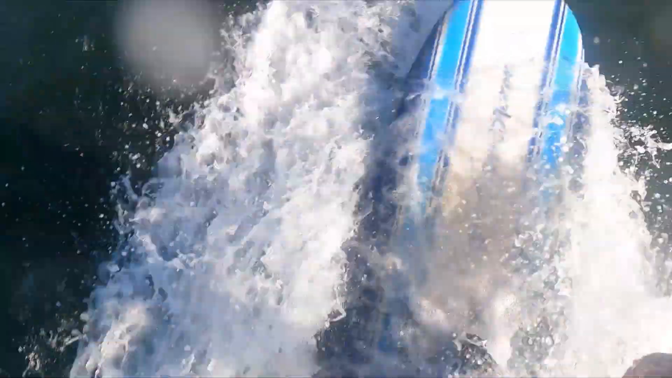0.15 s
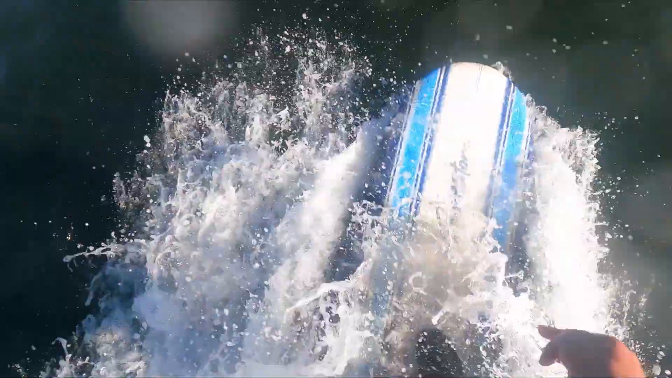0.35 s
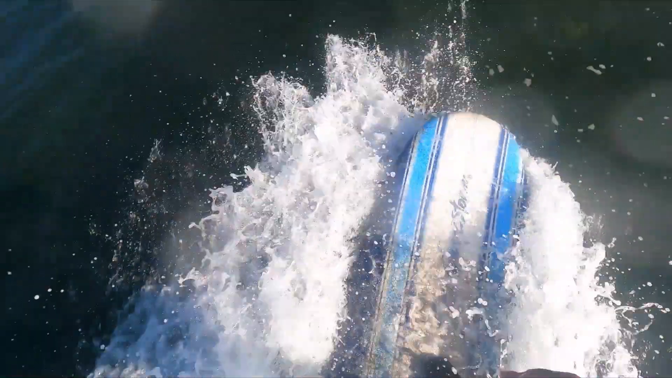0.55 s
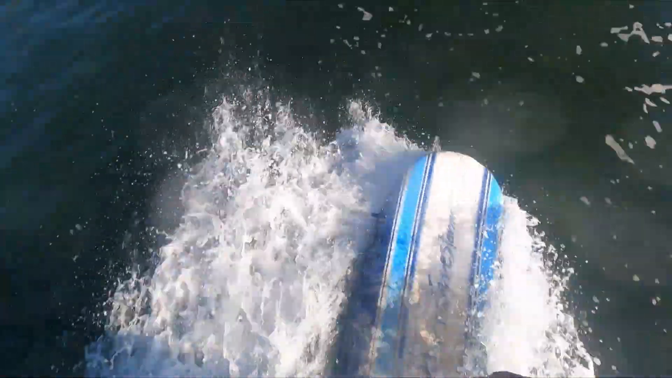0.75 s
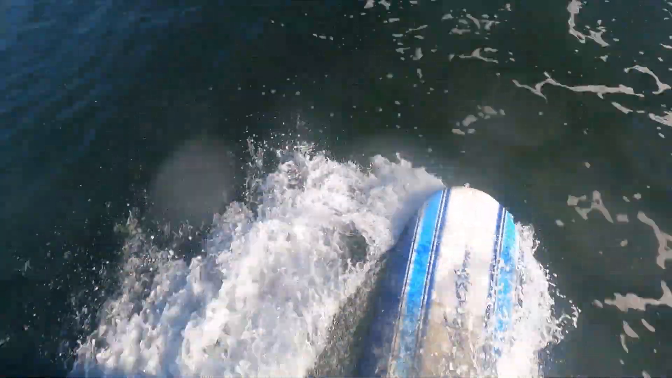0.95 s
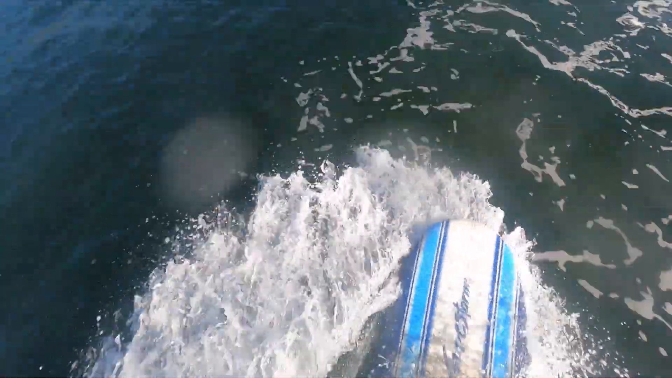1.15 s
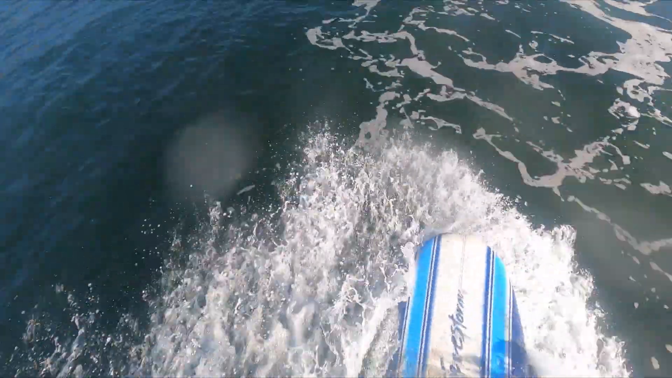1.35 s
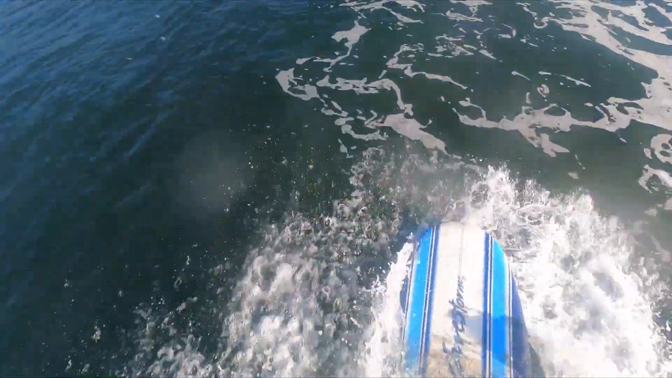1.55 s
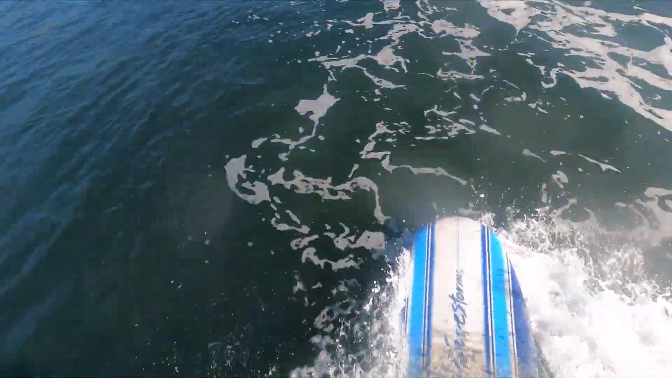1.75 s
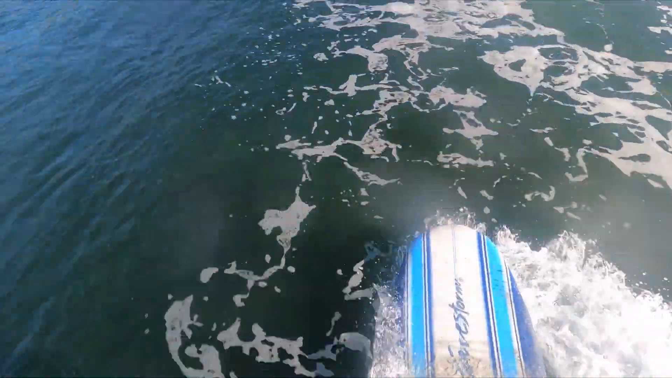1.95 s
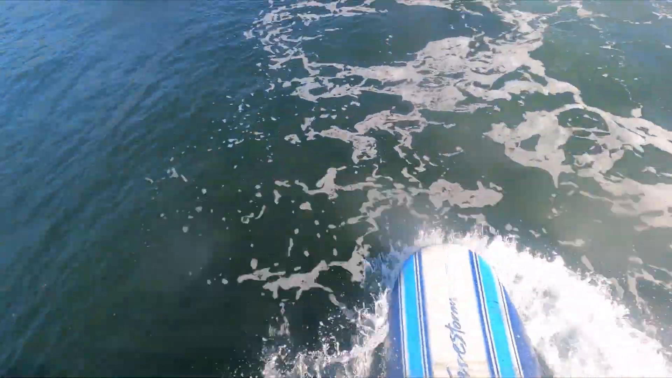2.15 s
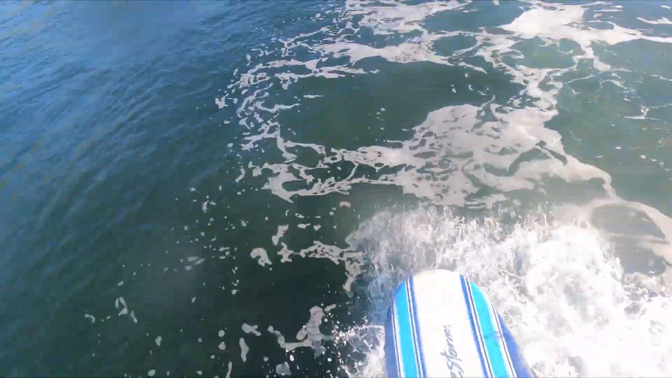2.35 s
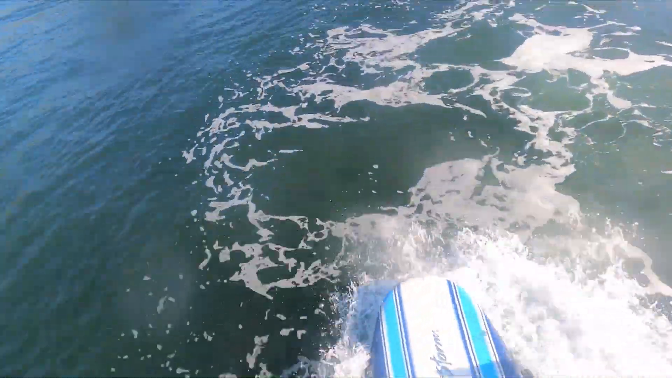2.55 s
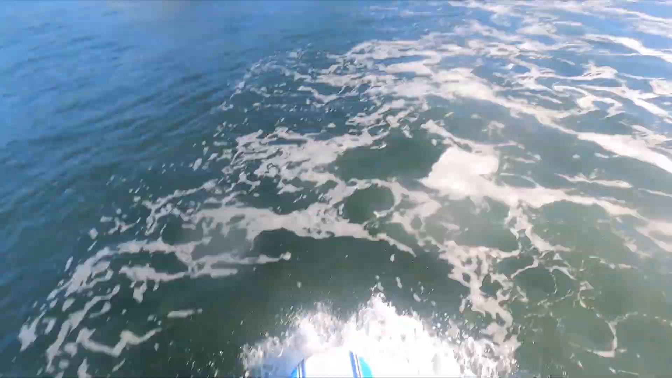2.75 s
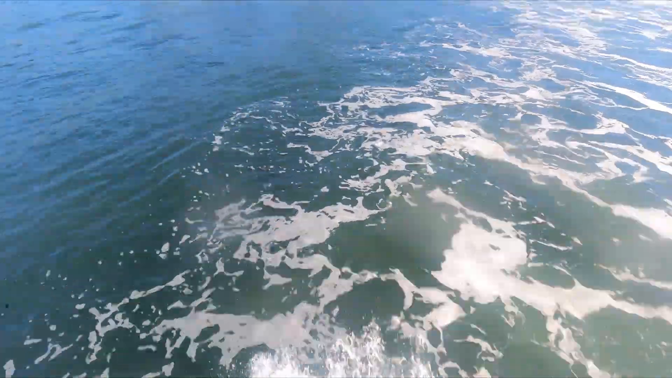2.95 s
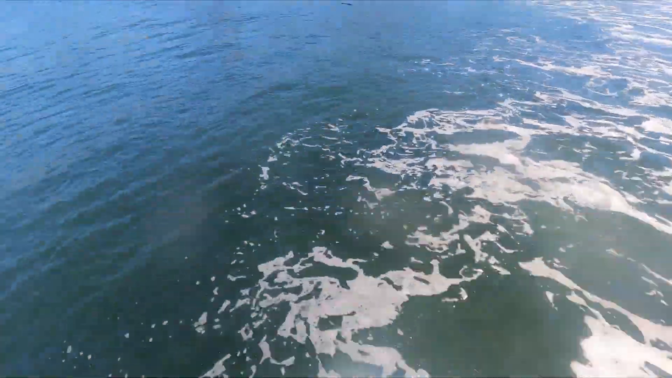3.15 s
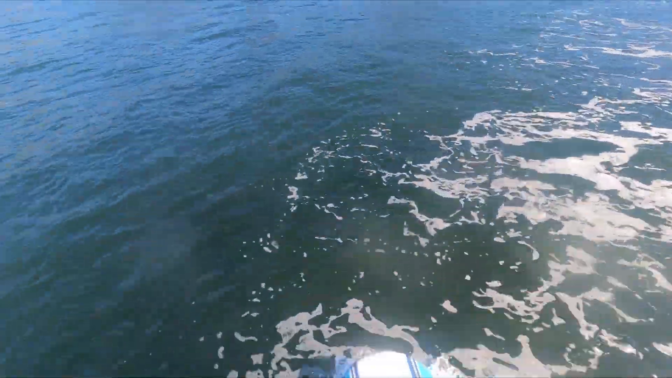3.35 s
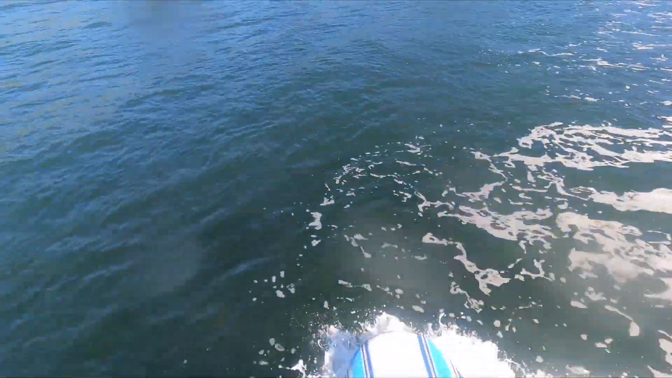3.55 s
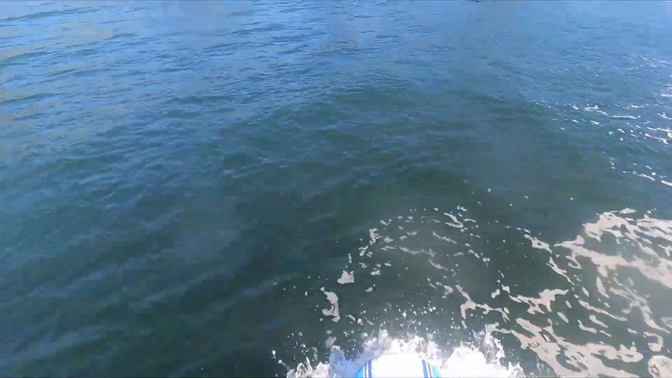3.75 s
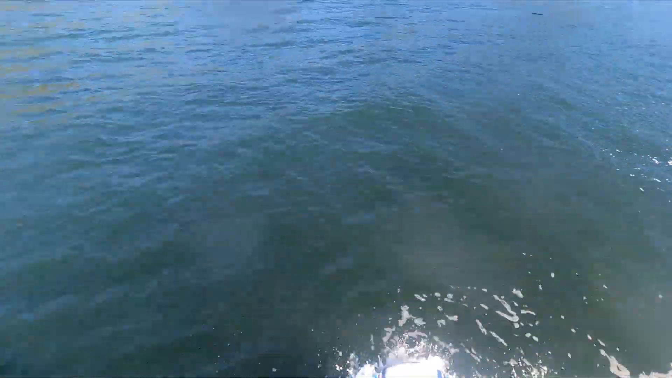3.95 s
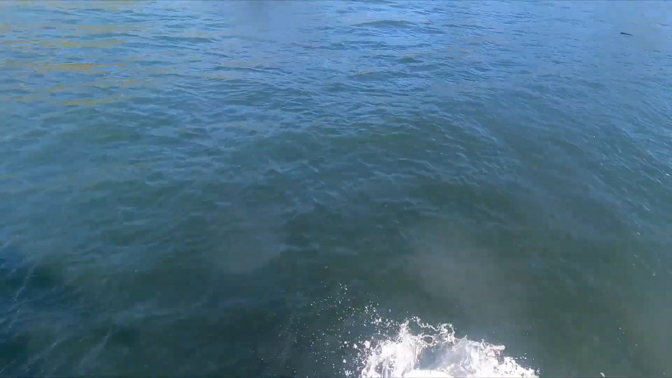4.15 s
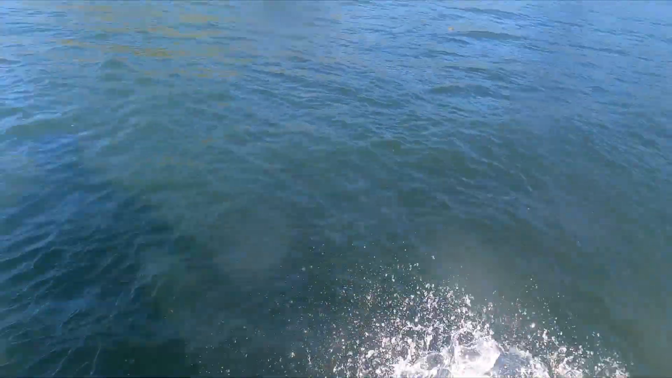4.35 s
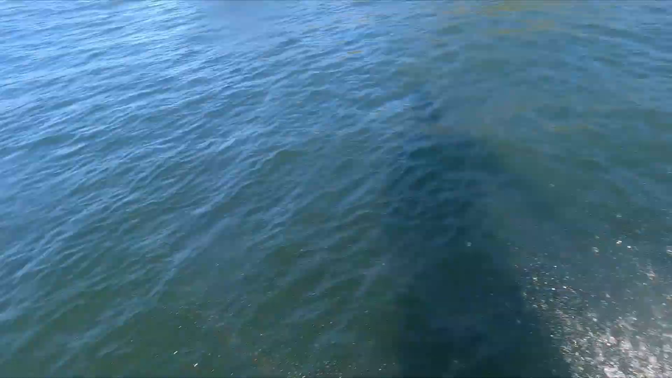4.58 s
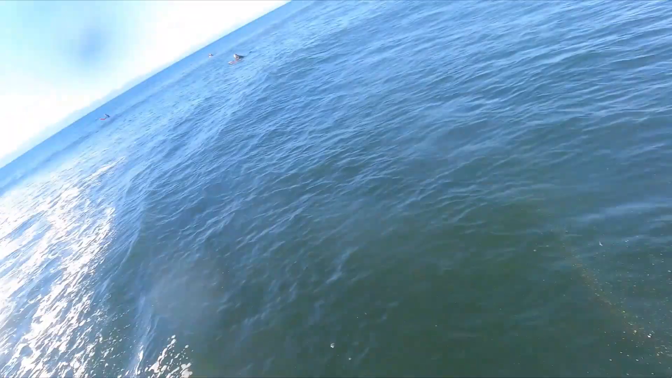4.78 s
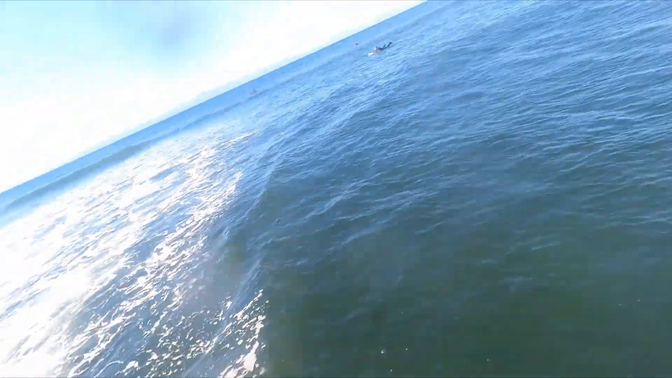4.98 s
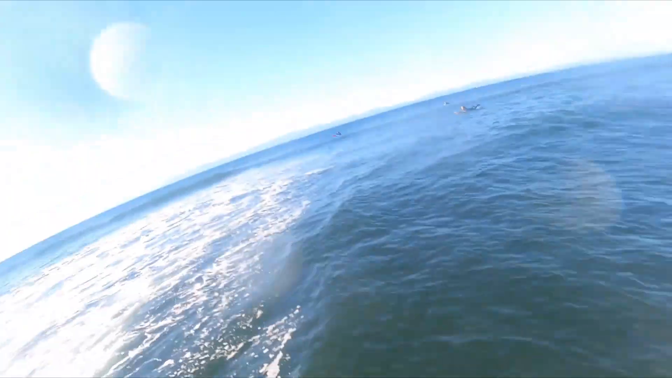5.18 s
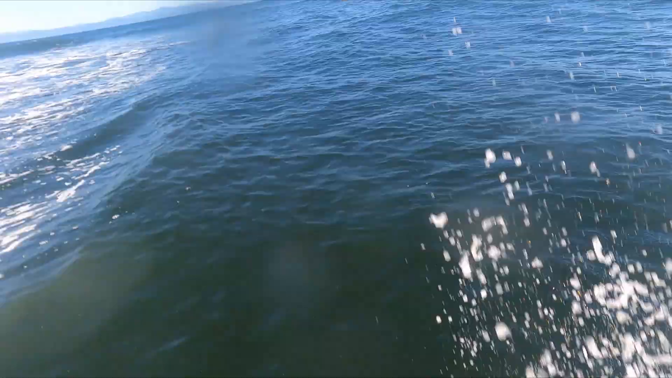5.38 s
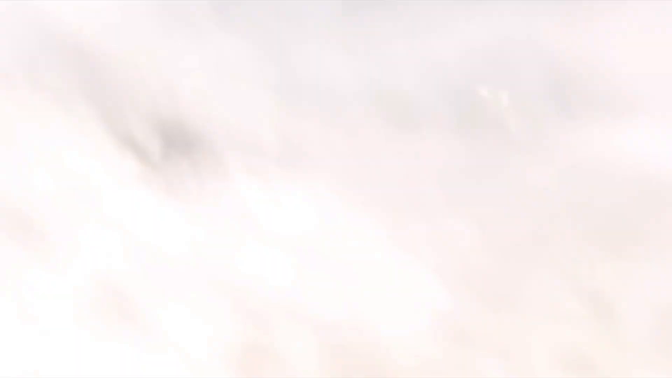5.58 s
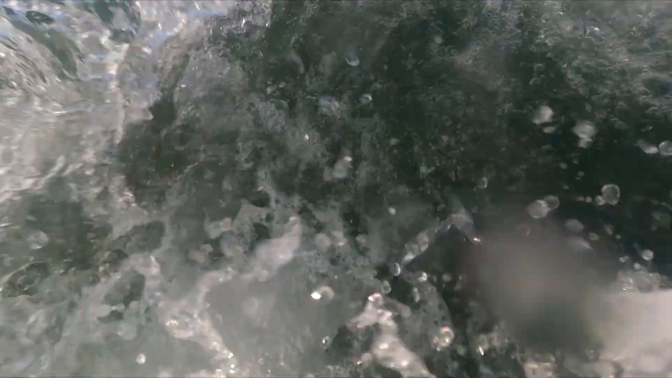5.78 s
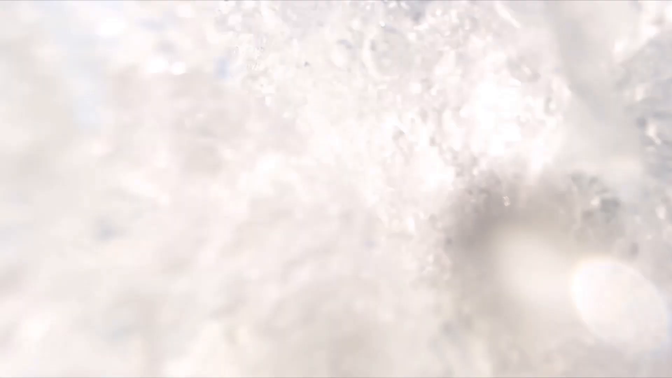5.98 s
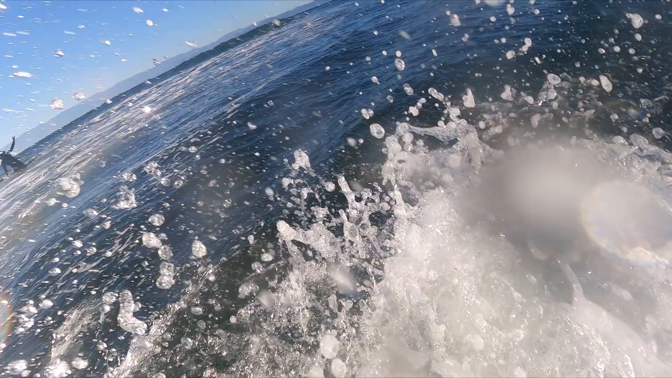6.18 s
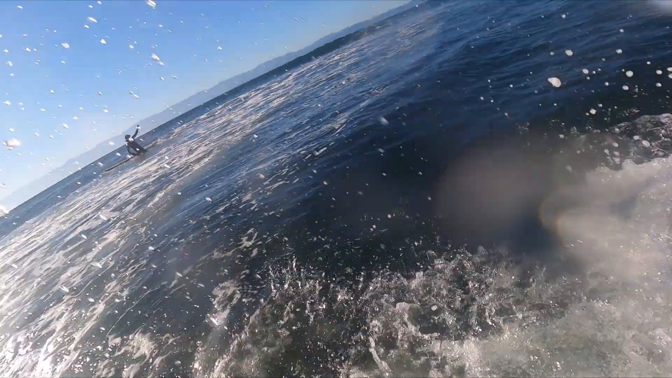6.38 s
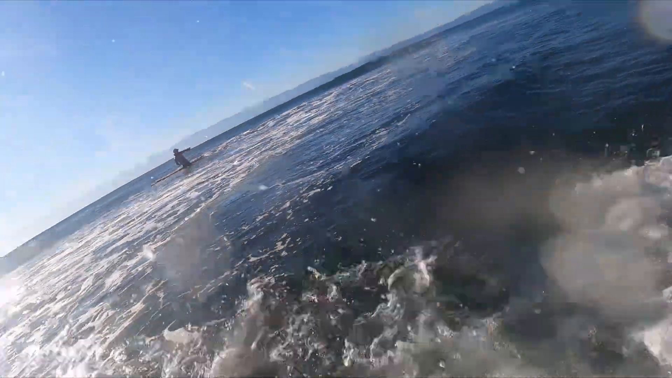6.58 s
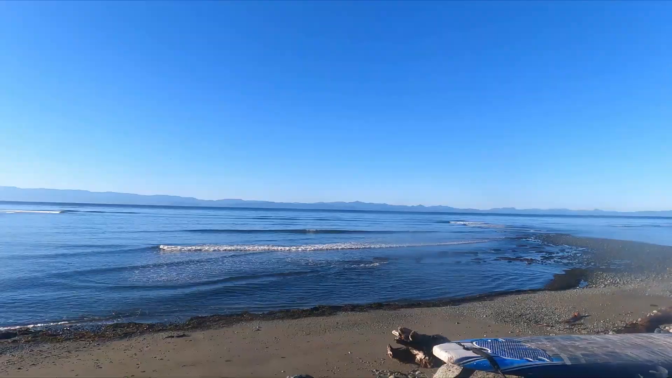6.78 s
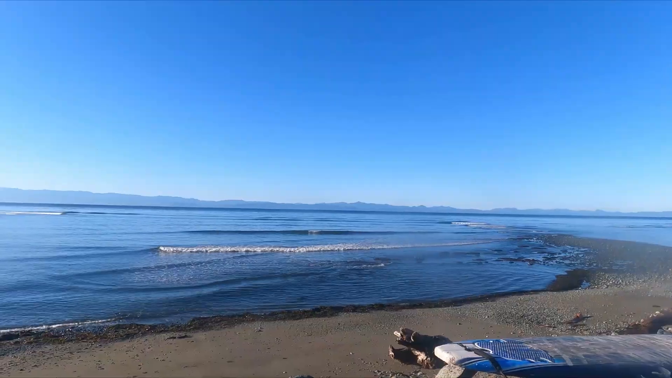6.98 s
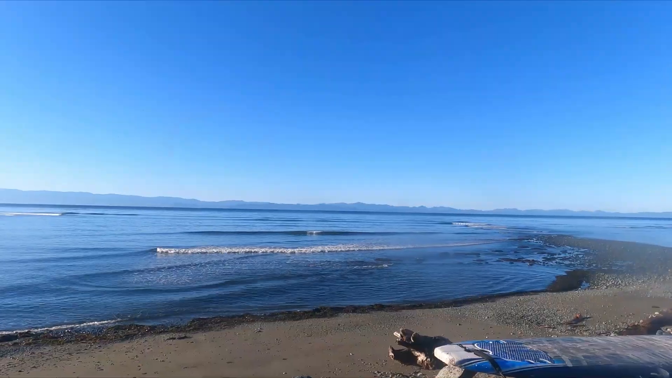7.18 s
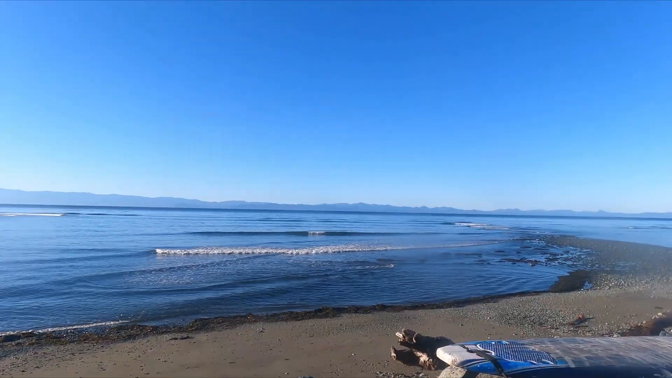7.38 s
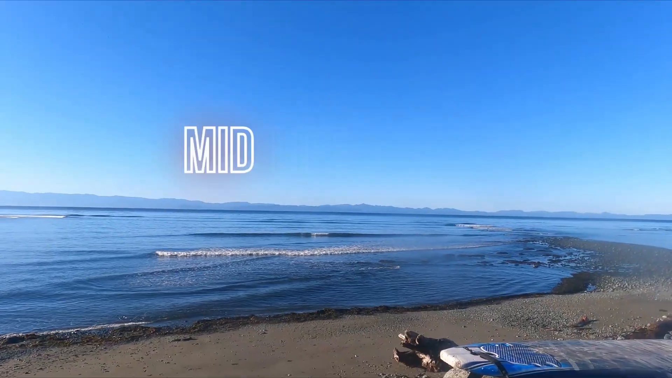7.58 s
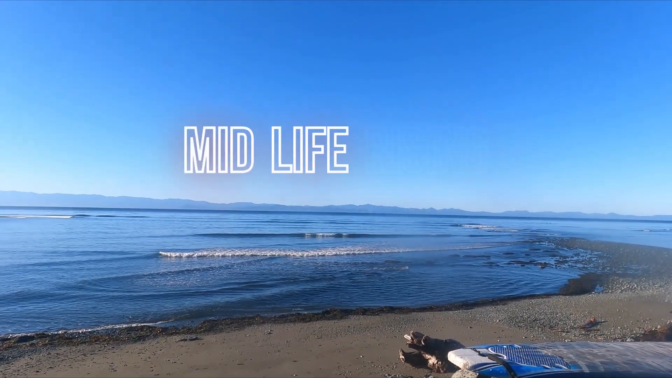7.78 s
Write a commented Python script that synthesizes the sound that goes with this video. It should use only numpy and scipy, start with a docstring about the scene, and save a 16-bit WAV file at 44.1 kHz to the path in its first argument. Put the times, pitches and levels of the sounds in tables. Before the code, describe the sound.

From 0 to about 5.2 seconds, a surfboard planes over the sea, heard from a small microphone in a housing close to the water. Bubbly spray hisses over churning water, strongest at first and fluctuating. Low wind rumble buffets in gusts and gradually eases, with a wavering hollow hum, breathy midrange whistling and occasional faint high hiss. Dull thumps come near 0.3, 3.05 and 4.9 seconds, with a small drop at 4.8. At 5.3 the board plunges: sharp wet slaps and heavy low thumps, then another hard cluster around 5.65. Muffled white water swells to a crest near 6.0, with spluttering sheets, gurgles, ringing bubbles and more slaps until 6.5, draining quickly. A short silence at 6.75 to 6.95 gives way to a calm, very quiet shore: light low breeze, distant surf, and dry ticks near 7.05, 7.5 and, loudest, 7.8, where a soft low thump also lands.

```python
"""Sea, then shore: a surfboard planes; bow spray is bubbly noise, wind is low turbulence plus a hum and whistles.
At 5.3 s the board plunges: slaps ring trapped air, sheets of water splutter as bubble swarms,
large bubbles ring with rising pitch and low surges thump on the diaphragm.
After a short silence a calm shore follows: light wind, far surf and a few dry ticks."""
import sys
import numpy as np
from scipy import signal
from scipy.fft import rfft, irfft, next_fast_len
from scipy.io import wavfile
from scipy.ndimage import uniform_filter1d, map_coordinates

SR = 44100
rng = np.random.default_rng(int(sys.argv[2]) if len(sys.argv) > 2 else 0)


def digitize_waveform(pressure):
    """Quantize a signal to 16-bit integers and store it at the path in sys.argv[1].

    Rows of a 2-D input are taken as channels; values are limited to [-1, 1].
    """
    field = np.atleast_2d(pressure).T
    bounded = np.clip(field, -1, 1)
    quanta = np.round(bounded * 32767).astype(np.int16)
    wavfile.write(sys.argv[1], SR, quanta)


N = 345289

# Column side_db is left minus right; level_db is relative within a table.
RIDE_END_S, SHORE_START_S = 6.73, 6.965
PLUNGE_S, STALL_S = 5.27, 0.16  # plunge; fade of the ride's noise

# wind on the ports; the headwind eases as the board slows
HEADWIND_START_DB, EASE_DB_PER_S = -24, 1.64
BREEZE_DB = -35  # on the shore
# gusts: middle_s, length_s, level_db
GUSTS = [(.31, 0.35, -19.5), (.76, 0.26, -23), (1.15, 0.23, -21), (2.86, 0.2, -23), (3.22, 0.29, -27.5),
         (4.88, 0.19, -18.5), (5.31, 0.091, -14), (7.09, 0.18, -29.5), (7.55, 0.11, -27),
         (7.79, 0.19, -25.5)]
# spectrum of wind rumble: freq_hz, density_db_per_hz
RUMBLE_SPECTRUM = [(8, -20), (20, 2), (42, -4.5), (85, -6.5), (130, -14.5), (200, -19), (400, -34),
                   (1000, -71.5)]
# hoots of air across a hollow of the housing: middle_s, length_s, level_db
HOOTS = [(.16, 0.34, -25), (.86, 0.18, -29), (1.15, 0.57, -31.5), (1.6, 0.44, -31.5), (2.32, 0.21, -27),
         (2.56, 0.09, -24.5), (2.83, 0.22, -26), (3.75, 0.12, -28), (4.05, 0.32, -28), (4.44, 0.11, -32.5),
         (4.7, 0.076, -27.5)]
HUM_HZ, HUM_FLOOR_DB = 212.9, -39  # hollow's mean pitch; level between hoots
# crosswinds that make the housing whistle: middle_s, length_s, level_db
CROSSWINDS = [(.25, 0.34, -35.5), (1.67, 0.82, -32), (2.55, 0.81, -35.5), (3.37, 0.74, -31.5),
              (4.98, 0.12, -41.5)]
WHISTLE_FLOOR_DB = -37.5  # between crosswinds
# housing resonances in the airflow: centre_hz, nominal_width_hz, level_db, side_db
WHISTLE_MODES = [(786, 170, -6, 3.5), (950.6, 115, -0.5, 5.5), (1180, 540, -17, 17)]
# drifting hiss at a port edge: time_s, centre_hz, level_db
EDGE_HISS = [(1.2, 5000, -69), (1.48, 4824, -45), (1.83, 4720, -47.5), (2.1, 4660, -58), (2.95, 5050, -65),
             (3.13, 4980, -47.5), (3.37, 4720, -44), (3.62, 4660, -49.5), (3.75, 4645, -55.5),
             (4.7, 4690, -50.5), (5.0, 4860, -47), (5.15, 5050, -62)]

# bow wave, levels before trim: time_s, churn_db, spray_db
BOW_WAVE = [(0.0, -32.5, -30.5), (0.25, -34, -33.5), (0.34, -36, -35.5), (0.92, -33.5, -37.5),
            (1.66, -33.5, -35), (2.07, -34.5, -39), (2.57, -29.5, -36), (3.03, -35.5, -38.5),
            (3.19, -30, -38), (3.28, -35.5, -39), (3.86, -33, -39), (4.79, -36.5, -36),
            (4.84, -36.5, -39.5), (5.03, -28, -40), (5.1, -34.5, -42)]
# spectrum of churning water: freq_hz, density_db_per_hz
CHURN_SPECTRUM = [(60, -22.5), (140, -2.5), (250, 1.5), (300, -3), (380, 0), (460, -4), (550, -11),
                  (750, -8.5), (1000, -14.5), (1400, -19), (3000, -49)]
# spectrum of spray: freq_hz, density_db_per_hz
SPRAY_SPECTRUM = [(500, -3.5), (1350, -9.5), (1700, -1), (1900, -2.5), (2200, 4), (2600, -3.5), (2950, -2),
                  (3350, -10.5), (3900, -11), (4230, -5), (4450, -8.5), (4750, -6), (5600, -11.5),
                  (7000, -13), (9000, -17), (12000, -26)]

# white water builds after the plunge, crests, drains; each layer scales these slopes
CREST_S, FLOW_BUILD_DB_PER_S, FLOW_DRAIN_DB_PER_S = 6.043, 17, 17.5
# rocking of the ports: level at the crest, slopes before and after
ROCK_CREST_DB, ROCK_BUILD_DB_PER_S, ROCK_DRAIN_DB_PER_S = -24.5, 23, 26.5
# housing colour of water running over it: freq_hz, gain_db
HOUSING_COLOUR = [(750, 1), (1250, -3), (1600, 1), (2200, 1), (2650, -4), (3000, 2.5), (3550, -5),
                  (4200, 2)]
# drops and slaps on the housing: start_s, level_db, trapped_air_hz, decay_s, side_db
SLAPS = [(4.797, -21, 4300, 0.007, -3.5), (5.273, -9, 1100, 0.002, 6), (5.315, -11, 530, 0.013, 6.5),
         (5.324, -15, 4300, 0.0024, -2.5), (5.331, -6, 440, 0.0084, -4), (5.3325, -11, 2900, .001, 2),
         (5.352, -22, 5000, .0027, -0.5), (5.372, -25.5, 5000, 0.00233, 2.5),
         (5.385, -7.5, 423, 0.0047, 2.5), (5.385, -14.5, 2200, 0.0008, -6), (5.594, -22, 1800, 0.0067, 0),
         (5.6317, -6.5, 1800, 0.003, -1), (5.649, -0.5, 2170, 0.0014, -1.5),
         (5.659, -16, 5800, 0.0011, 2.5), (5.671, -19, 1770, 0.002, -9), (5.680, -14.5, 5000, 0.0021, -4.5),
         (6.010, -11.5, 400, .004, 0), (6.011, -15, 5200, 0.0036, 0), (6.180, -9.5, 1500, 0.0023, 6),
         (6.191, -8, 690, 0.0075, 4), (6.259, -5, 850, 0.0018, 3), (6.274, -12.5, 2200, 0.002, -4.5),
         (6.356, -13.5, 1090, 0.0016, 4), (6.393, -20, 600, 0.0036, 4), (6.428, -21, 1000, 0.0028, 5),
         (6.448, -15, 885, 0.0015, 2), (6.478, -9, 800, 0.0021, 2.5)]
# sheets of water over the housing: start_s, length_s, level_db, centre_hz, gurgle_re_sheet_db, side_db
SHEETS = [(5.7025, 0.014, -12, 2030, -13, -2.5), (5.741, 0.014, -18, 4300, -16.5, -1),
          (5.748, .025, -16, 1470, -8, -2), (6.001, 0.052, -20.5, 4870, -9, 0.5),
          (6.02, 0.048, -19.5, 1560, -2, 0.5), (6.07, 0.034, -24.5, 1510, 1, 1),
          (6.111, .031, -24.5, 2960, 2, 0), (6.167, .042, -20, 1560, 2, 0.5), (6.21, .066, -23, 1255, 0, 2),
          (6.3, .027, -28, 1380, 1, 1.5)]
# large bubbles and drips close by: start_s, level_db, initial_pitch_hz, swell_s, side_db
BUBBLES = [(5.2725, -15, 1820, 0.0013, -10), (5.274, -25, 2430, .004, -9), (5.337, -29, 2380, 0.0044, -7.5),
           (5.875, -23.5, 6890, 0.0011, 0), (6.026, -18.5, 1920, 0.0018, -0.5),
           (6.091, -20.5, 3770, 0.0016, 8.5), (6.118, -14, 1737, 0.0025, -2.5),
           (6.119, -20.5, 4230, 0.0017, -0.5), (6.136, -15, 1513, 0.0025, 13),
           (6.18, -23.5, 4160, .0015, -1), (6.195, -22.5, 3750, 0.0015, -2), (6.202, -20, 1603, .003, 4),
           (6.479, -23.5, 288, 0.0023, 1), (6.513, -39, 4700, 0.0014, 0), (6.52, -32.5, 1400, .002, 0),
           (6.600, -37, 5100, .0018, 0)]
# pressure surges of air and water on the diaphragm: centre_s, level_db, pitch_hz
THUMPS = [(.305, -15, 45), (3.049, -13.5, 45), (4.9, -12, 50.4), (5.333, -2, 44.6), (5.385, -4.5, 41.3),
          (5.653, -16, 75), (5.72, -9.5, 70), (6.014, -12.5, 120), (6.048, -8.5, 85), (6.171, -8, 92.5),
          (6.198, -7, 67), (7.744, -14.5, 41.4)]
# water films muffling the ports: middle_s, length_s, depth_db
FILMS = [(5.417, 0.053, 4), (5.493, 0.021, 8), (5.818, 0.029, 10.5), (6.144, 0.0143, 13), (6.288, .03, 4.5)]
FILM_CORNER_HZ = 900  # film damps the sound above this

# dry ticks close to the microphone: start_s, level_db
TICKS = [(7.036, -29), (7.502, -27), (7.801, -18)]
# resonances of a tick: centre_hz, stage_width_hz, level_db
TICK_MODES = [(714, 980, 5.5), (3350, 1800, -18)]
# spectrum of far surf: freq_hz, density_db_per_hz
SURF_SPECTRUM = [(100, -1), (250, -2), (500, -2.5), (780, -0.5), (1100, -12), (1500, -16), (2450, -13.5),
                 (3100, -19), (4500, -29), (6000, -40.5)]

# left-right correlation of the ports: freq_hz, correlation
PORT_CORRELATION = [(220, 1), (450, 0.74), (1000, 0.69), (2200, 0.89), (3000, 0.25), (4500, 0.86),
                    (7000, 0.94), (12000, 0.45)]
# treble difference of the ports: freq_hz, side_db
PORT_BALANCE = [(2800, 0), (4500, -1), (7000, 0.5), (9000, 4), (12000, 11.5)]
# passed by the wet microphone membrane: freq_hz, gain_db
MEMBRANE = [(6500, 0), (7300, -2.5), (8000, -10), (8800, -12.5), (10000, -23.5), (11000, -24.5),
            (12200, -17), (13500, -39.5)]
TOP_HZ = 15000


def amp(db):
    """Decibels to gain."""
    return 10 ** (np.asarray(db) / 20)


def unit(x):
    """Scale to rms 1."""
    return x / np.sqrt(np.mean(x ** 2) + 1e-20)


def along(points, freq_hz):
    """(freq_hz, value) points read on a log axis."""
    f, v = np.transpose(points)
    return np.interp(np.log(freq_hz + 1), np.log(f + 1), v)


def curves(rows):
    """One value per sample for each column after the time."""
    s, *cols = np.transpose(rows)
    return [np.interp(np.arange(N) / SR, s, c) for c in cols]


def wobble(rate_hz):
    """Smooth random curve, rate_hz knots a second."""
    knots = rng.standard_normal(int(N * rate_hz / SR) + 4)
    return map_coordinates(knots, [np.arange(N) * rate_hz / SR])


def filtered(x, response):
    """x times a response of frequency."""
    n = x.shape[-1]
    m = next_fast_len(n + SR // 8)
    return irfft(rfft(x, m) * response(np.fft.rfftfreq(m, 1 / SR)), m)[..., :n]


def resonance(f, centre_hz, width_hz):
    """Causal response of one resonance."""
    return 1j * f * width_hz / (centre_hz ** 2 - f ** 2 + 1j * f * width_hz)


def pan(side_db):
    """Left and right gains for a level difference."""
    return amp([[side_db / 2], [-side_db / 2]])


def ports(pair, response):
    """Colour two unrelated signals and blend them to the ports' correlation; rms 1."""
    def mid_side(f):
        turn = np.arccos(np.clip(along(PORT_CORRELATION, f), -1, 1)) / 2
        return response(f) * np.array([np.cos(turn), np.sin(turn)])
    mid, side = filtered(pair, mid_side)
    return unit(np.array([mid + side, mid - side]))


def turbulence(patchy_db):
    """Two noises whose level drifts in shared patches of time and frequency."""
    z = signal.stft(rng.standard_normal((2, N)), nperseg=512)[2]
    patches = uniform_filter1d(rng.standard_normal(z.shape[1:]), size=6, axis=0)
    patches = uniform_filter1d(patches, size=12, axis=1)
    noise = signal.istft(z * amp(patchy_db * unit(patches)), nperseg=512)[1]
    return unit(noise[:, :N])


def steady(x, window_s):
    """Noise with its slow chance swells evened out."""
    power = uniform_filter1d(np.mean(x ** 2, 0), int(window_s * SR))
    return x / np.sqrt(np.abs(power) + 1e-3)


def fizz(n, rate_hz, pitch_hz, cycles, spread_db):
    """Two swarms of tiny bubbles, each a damped sine of its own pitch and size."""
    count = int(rate_hz * n / SR) + 2
    t = np.arange(SR // 200) / SR
    out = []
    for _ in range(2):
        start = rng.integers(0, n, count)
        size = amp(spread_db * np.minimum(rng.exponential(size=count), np.pi))
        pitches_hz = pitch_hz * np.exp(0.62 * rng.standard_normal((count, 1)))
        phase = np.minimum(pitches_hz, SR / 4) * t  # in cycles
        grains = size[:, None] * np.sin(2 * np.pi * phase) * np.exp(-phase / cycles) * (1 - t / t[-1])
        index = (start[:, None] + np.arange(len(t))).ravel()
        out.append(np.bincount(index, grains.ravel(), n)[:n])
    return unit(np.array(out))


def add(track, start_s, sound):
    """Mix a sound in at start_s."""
    part = track[:, round(start_s * SR):][:, :sound.shape[-1]]
    part += sound[..., :part.shape[1]]


def narrow(pitch_hz, rate_hz):
    """Breathy tone: a carrier whose strength and phase wander at rate_hz."""
    drift = wobble(rate_hz) + 1j * wobble(rate_hz)
    carrier = np.exp(2j * np.pi * np.cumsum(pitch_hz) / SR)
    return unit(np.real(drift / np.abs(drift) ** 0.18 * carrier))


def swells(rows, order=2):
    """Power sum of (middle_s, length_s, level_db) swells; a higher order has a flatter top."""
    t = np.arange(N) / SR
    return np.sqrt(sum((amp(db) * np.exp(-np.abs(2 * (t - s) / length) ** order)) ** 2
                       for s, length, db in rows))


def planing():
    """1 while the board planes, falling to 0 as it plunges."""
    return np.clip(1 - (np.arange(N) / SR - PLUNGE_S) / STALL_S, 0, 1)


def white_water(churn_db, spray_db):
    """Water churns and breaks into spray: turbulent noise with a fizz of bubbles."""
    flutter = wobble(22.01)
    churn = ports(turbulence(patchy_db=1.5), lambda f: amp(along(CHURN_SPECTRUM, f)))
    fizzing = fizz(N, rate_hz=980, pitch_hz=3015, cycles=2.5, spread_db=1.0)
    foam = turbulence(patchy_db=1.1) + amp(-10.5) * fizzing
    spray = ports(foam, lambda f: amp(along(SPRAY_SPECTRUM, f)))
    churn = amp(churn_db + flutter) * pan(0.8) * churn
    return churn + amp(spray_db + 0.5 * flutter) * pan(-0.72) * spray


def bow_wave():
    """White water thrown up under the planing board."""
    churn_db, spray_db = curves(BOW_WAVE)
    return planing() * white_water(churn_db + 3.5, spray_db + 0.77)


def rumble(lumpy_db):
    """Eddies beating on the ports: low turbulence of uneven level."""
    eddies = ports(turbulence(patchy_db=0.62), lambda f: amp(along(RUMBLE_SPECTRUM, f)))
    return unit(steady(eddies, 0.12) * amp(lumpy_db * wobble(28)))


def whistles():
    """Turbulence ringing the resonances of the housing."""
    def modes(f):
        return np.sqrt(sum(np.abs(amp(db) * pan(side_db) * resonance(f, hz, 1.4 * width) ** 2) ** 2
                           for hz, width, db, side_db in WHISTLE_MODES))
    return unit(filtered(ports(turbulence(patchy_db=0.93), np.ones_like), modes))


def wind():
    """Airflow on the planing board: buffeting eddies, hollow hum, housing whistles, port-edge hiss."""
    t = np.arange(N) / SR
    headwind = amp(HEADWIND_START_DB - EASE_DB_PER_S * t)
    buffet = np.hypot(headwind, swells(GUSTS)) * rumble(lumpy_db=2.9)
    hum_level = np.hypot(amp(HUM_FLOOR_DB), swells(HOOTS, order=4))
    hum = hum_level * narrow(HUM_HZ + 3 * wobble(4.2), rate_hz=22)
    whistle_level = np.hypot(amp(WHISTLE_FLOOR_DB), swells(CROSSWINDS, order=4))
    whistle = whistle_level * whistles()
    edge_hz, edge_db = curves(EDGE_HISS)
    edge = amp(edge_db) * narrow(edge_hz + 150 * wobble(350), rate_hz=420)
    return planing() * (buffet + pan(1.4) * hum + whistle + pan(-1.5) * edge)


def slaps():
    """Each drop splats amid spatter, rings the air it traps and pushes the membrane."""
    out, t = np.zeros((2, N)), np.arange(SR // 16) / SR
    lead_s = 0.012  # spatter begins before the slap
    u = t / 0.0012
    push = (1 - u) * np.exp(-u) * (1 - np.exp(-t / 0.00015))
    for s, db, hz, decay_s, side_db in SLAPS:
        splat = ports(rng.standard_normal((2, len(t))),
                      lambda f: resonance(f, hz, 2.1 * hz) / (1 + (f / (3.6 * hz)) ** 3))
        pocket = np.sin(2 * np.pi * hz * t) * np.exp(-hz * t / 2.5)
        strike = (1 - np.exp(-t / 0.00082)) * np.exp(-t / decay_s)
        slap = strike * (0.33 * splat + 1.35 * pocket) - 0.55 * push
        add(out, s, amp(db + 1.5) * pan(side_db) * slap)
        spatter = ports(fizz(len(t), rate_hz=1400, pitch_hz=hz, cycles=2, spread_db=-3),
                        lambda f: resonance(f, hz, 2 * hz))
        spatter_level = amp(db - 25) * np.exp(-np.abs(t - lead_s) / 0.0037)
        add(out, s - lead_s, pan(side_db) * spatter_level * spatter)
    return out


def sheets():
    """Water sweeps over the ports: spluttering bubbles and droplets, low gurgles, a trickling tail."""
    out = np.zeros((2, N))
    for s, length_s, db, hz, gurgle_db, side_db in SHEETS:
        t = np.arange(int((length_s + 0.04) * SR)) / SR
        n = len(t)
        swarm = fizz(n, rate_hz=1600, pitch_hz=hz, cycles=7, spread_db=3)
        swarm = swarm + 0.5 * rng.standard_normal((2, n))
        droplets = fizz(n, rate_hz=500, pitch_hz=1.3 * hz, cycles=1, spread_db=2)

        def colour(f):
            body = amp(along(HOUSING_COLOUR, f)) * resonance(f, hz, 2.9 * hz)
            return body / (1 + (f / 10500) ** 3)
        crackle = steady(ports(swarm + droplets, colour), 0.006)
        gurgle = ports(fizz(n, rate_hz=740, pitch_hz=300, cycles=3.2, spread_db=4.0),
                       lambda f: resonance(f, 218, 300))
        splutter = amp(1.6 * map_coordinates(rng.standard_normal(64), [np.arange(n) * 190 / SR]))
        past_s = np.maximum(t - 0.96 * length_s, 0)
        tail = np.maximum(np.exp(-past_s / 0.0055), amp(-13) * np.exp(-past_s / 0.022))
        swell = np.minimum(t / 0.007, 1) ** 1.2 * tail
        water = crackle + amp(gurgle_db) * gurgle
        add(out, s, amp(db - 3) * pan(side_db) * swell * splutter * water)
    return out


def sheet_weight():
    """Each sheet leans on the ports and rumbles; the duller the sheet, the heavier."""
    loads = [(s + length_s / 2, length_s, db - 9 * np.log2(hz / 1000))
             for s, length_s, db, hz, *_ in SHEETS]
    return amp(4.0) * swells(loads) * rumble(lumpy_db=-2.5)


def bubbles():
    """Large bubbles swell, ring with a trembling pitch that rises as they near the surface, and die."""
    out, t = np.zeros((2, N)), np.arange(SR // 20) / SR
    for s, db, hz, swell_s, side_db in BUBBLES:
        tremble = 0.07 * np.cumsum(rng.standard_normal(len(t)))
        envelope = (t / swell_s * np.exp(1 - t / swell_s)) ** 2
        ring = np.sin(2 * np.pi * hz * t * (1 + 2 * t) + tremble) * envelope
        add(out, s, amp(db) * pan(side_db) * ring)
    return out


def thumps():
    """Each surge swings the diaphragm once, with a smaller swing before and after."""
    out, t = np.zeros((2, N)), np.arange(-SR // 10, SR // 10) / SR
    for s, db, hz in THUMPS:
        swing = np.cos(2 * np.pi * hz * t) * np.exp(-(hz * t / 0.6) ** 2)
        add(out, s + t[0], -amp(db) * swing)
    return out


def wash():
    """Plunged: white water swells round the housing, rings it, rocks the ports and patters in droplets."""
    t = np.arange(N) / SR - CREST_S
    flow_db = np.minimum(FLOW_BUILD_DB_PER_S * t, -FLOW_DRAIN_DB_PER_S * t)
    water = white_water(1.34 * flow_db - 30.5, 1.15 * flow_db - 35.0)
    ringing = amp(flow_db - 35.5) * whistles()
    rock_db = ROCK_CREST_DB + np.minimum(ROCK_BUILD_DB_PER_S * t, -ROCK_DRAIN_DB_PER_S * t)
    rocking = amp(rock_db) * rumble(lumpy_db=5.5)
    patter = ports(fizz(N, rate_hz=500, pitch_hz=2000, cycles=1.5, spread_db=3),
                   lambda f: amp(along(HOUSING_COLOUR, f)) * resonance(f, 2400, 6540))
    drops = (t > 0) * amp(1.04 * flow_db - 37) * patter  # only after the crest
    return (1 - planing()) * (water + ringing + rocking + drops)


def filmed(x):
    """Water films over the ports briefly damp the sound above FILM_CORNER_HZ."""
    t = np.arange(N) / SR
    loss_db = sum(db * np.exp(-(2 * (t - s) / length_s) ** 2) for s, length_s, db in FILMS)
    low = filtered(x, lambda f: 1 / (1 + (f / FILM_CORNER_HZ) ** 2))
    return low + amp(-loss_db) * (x - low)


def ticks():
    """Each tick is a dry knock with a few milliseconds of scuffing, ringing two broad modes."""
    out, t = np.zeros((2, N)), np.arange(SR // 20) / SR
    for s, db in TICKS:
        contact = (t == 0) + 0.26 * rng.standard_normal(len(t)) * np.exp(-t / 0.0028)
        add(out, s, amp(db + 17) * contact)

    def modes(f):
        ring = sum(amp(db) * resonance(f, hz, width) ** 2 for hz, width, db in TICK_MODES)
        return ring / (1 + (f / 4400) ** 12)
    return filtered(out, modes)


def shore():
    """Light breeze, rumbling lower than the ride's wind, and small waves far away as patchy noise."""
    breeze = unit(filtered(rumble(lumpy_db=5.0), lambda f: 1 / (1 + (f / 105) ** 2)))
    surf = ports(turbulence(patchy_db=2.5), lambda f: amp(along(SURF_SPECTRUM, f)))
    return np.hypot(amp(BREEZE_DB), swells(GUSTS)) * breeze + amp(-46.0) * surf.mean(0)


def scene():
    """The ride and the plunge, a moment of silence, then the shore."""
    t = np.arange(N) / SR
    at_sea = np.clip((RIDE_END_S - t) / 0.03, 0, 1) ** 2
    ashore = np.clip((t - SHORE_START_S) / 0.08, 0, 1) ** 2
    ride = at_sea * filmed(bow_wave() + wind() + wash())
    hits = slaps() + sheets() + sheet_weight() + bubbles() + thumps()
    return ride + hits + ticks() + ashore * shore()


def record(dry):
    """The loudest surges are rounded off; the membranes dull the top octave, the right one more."""
    rounded = dry / (1 + np.abs(dry / 0.93) ** 8) ** (1 / 8)

    def response(f):
        tilt_db = np.array([[1], [-1]]) * along(PORT_BALANCE, f) / 2
        return amp(along(MEMBRANE, f) + tilt_db) * (f < TOP_HZ)
    return filtered(rounded, response)


dry = scene()
out = record(dry)
digitize_waveform(out)
```